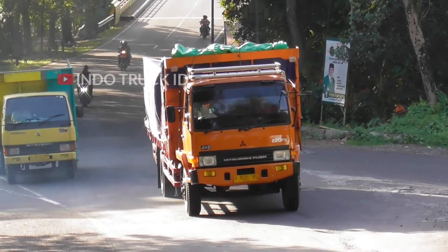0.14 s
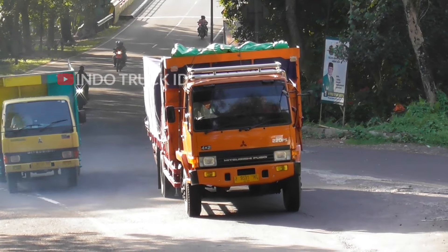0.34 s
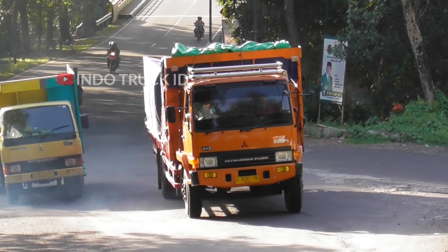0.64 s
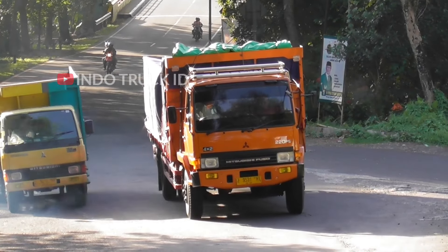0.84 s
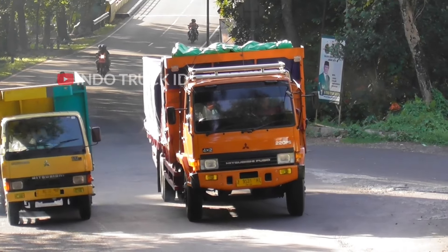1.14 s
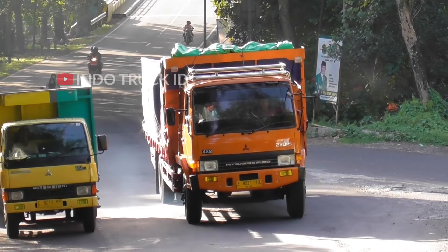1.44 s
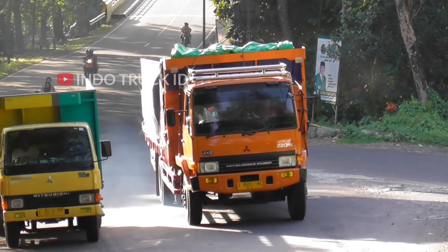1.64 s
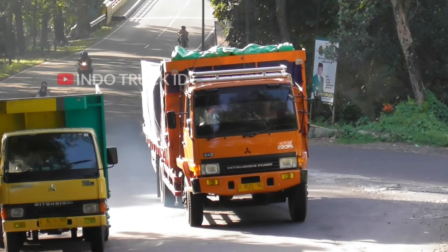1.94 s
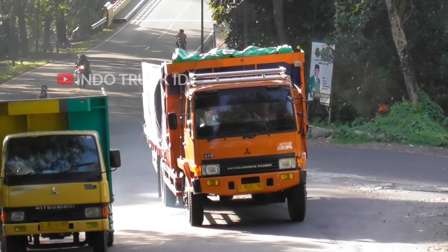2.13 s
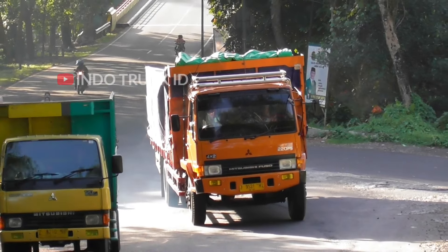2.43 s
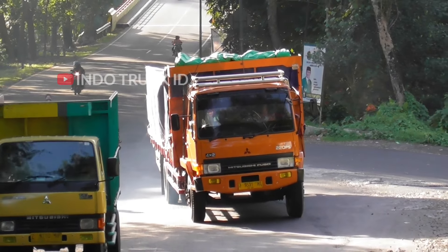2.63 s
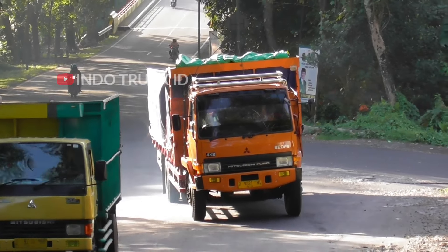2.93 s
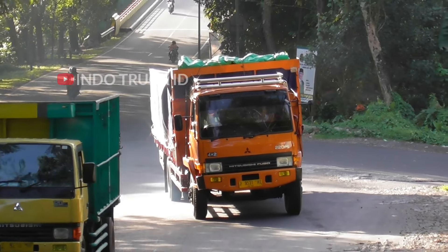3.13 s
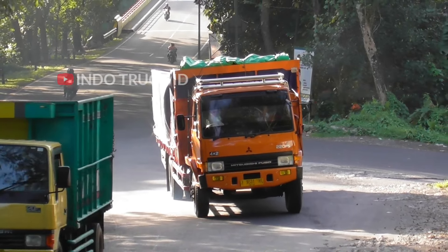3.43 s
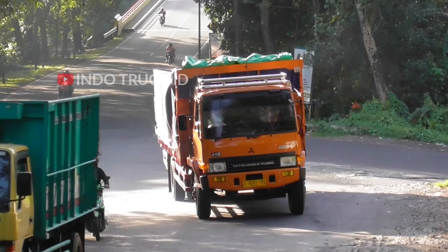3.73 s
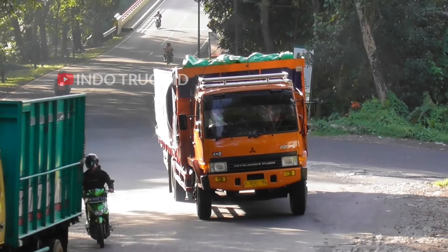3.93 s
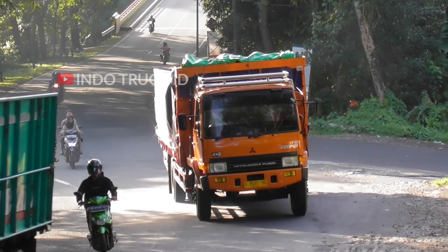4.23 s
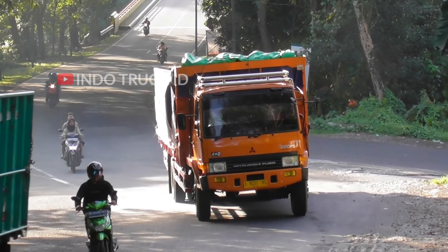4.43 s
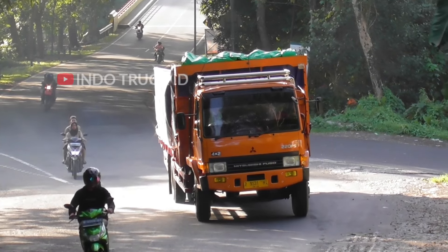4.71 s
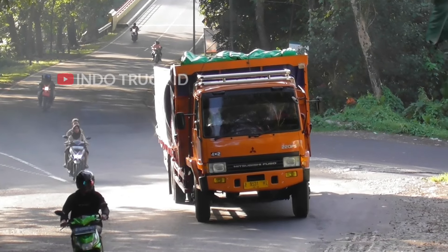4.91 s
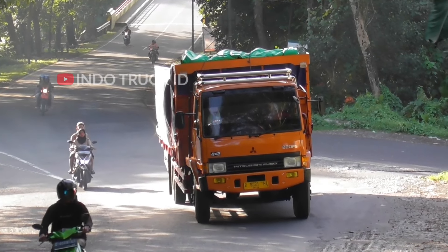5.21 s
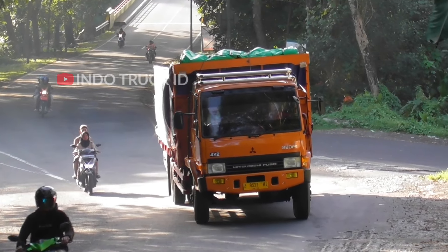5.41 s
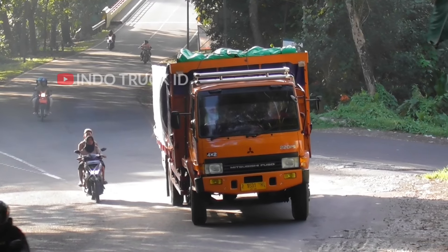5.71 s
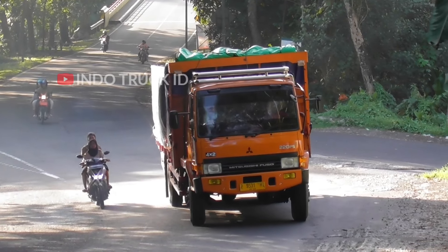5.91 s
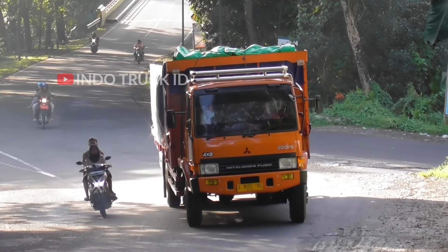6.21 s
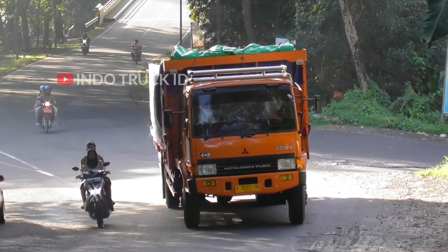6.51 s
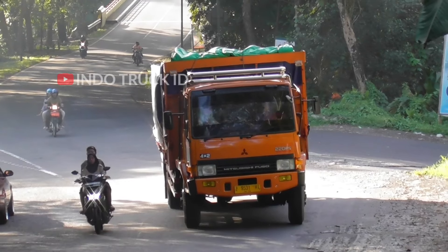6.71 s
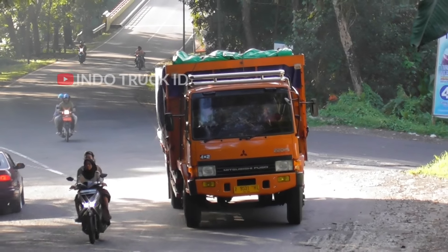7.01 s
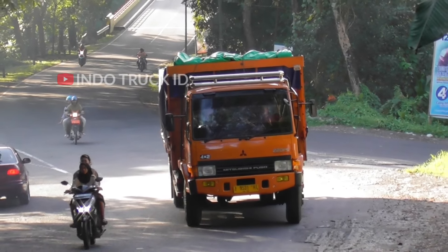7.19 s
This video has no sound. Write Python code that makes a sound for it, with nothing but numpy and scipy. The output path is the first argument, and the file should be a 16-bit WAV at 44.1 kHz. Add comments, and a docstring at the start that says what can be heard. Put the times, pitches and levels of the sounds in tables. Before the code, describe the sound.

Open hill road, close roadside stereo microphones, steady engine noise throughout. From 0 to 2 seconds a loaded diesel drones deep and buzzy, its revs sagging slightly, under a wash of clatter, airy hiss and low tyre rumble. A lighter truck passes at the same time with a gently rising tonal whine and coarse roar; three tiny squeaks come between about 1.1 and 1.5 seconds, with a brief clatter flare near the last and another at 1.9. Its whine and roar fade by around 3 seconds, as a low hum behind recedes. The noise thins near 3.3. From 3 seconds the loaded truck pulls harder, its throbbing exhaust climbing smoothly in pitch, swelling and dipping through hollow resonances. It eases slightly around 5.6, clatter flares at 6.35, then it surges to its highest, loudest and raspiest at the 7.35-second end, with clatter, hiss and rumble swelling.

```python
"""Loaded truck on a hill road

A loaded diesel truck labours uphill towards the microphone and slowly revs higher: harmonics of its
exhaust pulses glide through fixed pipe and body resonances. A lighter truck pulls past in the first
seconds, as a rising set of tones with a noise roar and short squeaks. Another engine hums behind and
recedes. Throbbing bands of noise make the clatter and hiss of engines and the rumble of the road."""
import sys
import numpy as np
from scipy import signal
from scipy.fft import rfft, irfft
from scipy.io import wavfile
from scipy.ndimage import uniform_filter1d, minimum_filter1d

SR = 44100
rng = np.random.default_rng(int(sys.argv[2]) if len(sys.argv) > 2 else 0)


def dump_mix(stems):
    """Bounce the given channels to the path in sys.argv[1] as a 16-bit WAV at rate SR."""
    frames = np.atleast_2d(stems).T  # one column per channel
    limited = np.clip(frames, -1, 1)  # hard clip at full scale
    pcm = np.round(limited * 32767).astype(np.int16)
    wavfile.write(sys.argv[1], SR, pcm)


N = 324116
TIME = np.arange(N) / SR

# the loaded truck's exhaust pulse rate: time_s, pulse_rate_hz
PULSE_RATE = [(0, 55.6), (0.35, 54), (0.9, 53.54), (1.85, 51.74), (2.45, 52.22), (3.05, 53.75),
              (3.65, 57.4), (4.3, 62.93), (5.25, 69.53), (5.6, 71.05), (6, 72.44), (7.15, 82.58),
              (7.35, 82.8)]
# its exhaust grows as it nears and works harder: time_s, level_db
EFFORT_LEVEL = [(0, -10), (1.2, -6.5), (2.1, -6), (3.4, -2), (4.3, 1), (5.6, -2), (6.4, 1), (7.35, 6)]
# strength of the exhaust harmonics: multiple of the pulse rate, level_db
PULSE_HARMONICS = [(1.0, -3.5), (2.0, -1.56), (3.0, 2), (4.0, 4), (5.0, -1), (6.0, -9.5)]
# fixed peaks and dips of the pipe and silencer: frequency_hz, gain_db
PIPE_RESPONSE = [(63.6, -32.7), (81.5, -14.0), (111.9, -14.8), (127.9, -8.7), (140.1, -2.8), (156.3, -9.7),
                 (183, -13), (188.5, -29), (194, -15.5), (209, -16), (231.6, -29.9), (242.2, -19.6),
                 (260.5, -33.6), (288.6, -17.9), (346.7, -34.7), (386.6, -21.8), (408.0, -38.5),
                 (444.0, -8.8), (496.0, -30.4)]
# the echo off the roadside comes sooner as the truck advances
ECHO_MS, ECHO_SHORTENS_MS_PER_S, ECHO_SHARE = 25.1, 0.636, 0.35
# pipe and body resonances that pick out the higher harmonics: centre_hz, width_hz, gain_db
BODY_RESONANCES = [(616, 60, -5.5), (731, 36, -6), (826, 60, -3.5), (1033, 100, -11.5), (1316, 70, -13.5)]
# half steps added by unequal cylinders: multiple of the pulse rate, level_db (within the rasp)
LOPE_HARMONICS = [(1 / 2, -0.63), (5 / 2, -11), (7 / 2, -8.5), (9 / 2, -11.5)]
# the rasp bites harder with the revs: full level, pulse rate that reaches it, growth below that
RASP_DB, RASP_AT_HZ, RASP_DB_PER_HZ = -28, 76.62, 0.7

# the lighter truck's tones: multiple of the strongest tone's pitch, level_db (relative)
PASSING_TONES = [(1 / 2, -13), (1, 0), (6 / 5, -18), (7 / 5, -17.5), (5 / 3, -22.5), (19 / 10, -17.5)]
# the strongest tone's starting pitch and even rise; the tones' level and accelerating fade
PASSING_HZ, PASSING_RISE_HZ_PER_S = 336.5, 10.4
PASSING_DB, PASSING_FADE_DB_PER_S2 = -18.5, 6
# colour of the lighter truck's roar: frequency_hz, density_db (per Hz, relative)
ROAR_COLOUR = [(150, -14), (300, -0.5), (420, -3), (600, -22), (1400, -11), (2000, -20), (3000, -16),
               (4000, -24), (6000, -37), (15400, -70)]
# the roar holds, then dies away
ROAR_DB, ROAR_HOLD_S, ROAR_FADE_DB_PER_S = -26, 1.13, 4
# squeaks as the lighter truck passes: start_s, length_s, peak pitch_hz, peak level_db
SQUEAK_EVENTS = [(1.114, 0.12, 777, -30), (1.247, 0.097, 813, -26.5), (1.415, 0.08, 750, -22.5)]

# tones of the engine behind: pitch_hz, level_db (relative)
HUM_TONES = [(101, -22.5), (152, -19), (189, -21.5)]
# starting trim of the hum and how fast it recedes
HUM_DB, HUM_FADE_DB_PER_S = -2, 3.5

# traffic noise: time_s, clatter_db, hiss_db (both before their trims), rumble_db
TRAFFIC_LEVELS = [(0, -25, -34.5, -20), (.6, -21.5, -31.5, -18), (1.6, -25, -36.5, -19.5),
                  (2.2, -25, -37.5, -18.5), (3.3, -32, -44.5, -24.5), (4.25, -28, -40, -23),
                  (4.7, -29, -41.3, -22.5), (5.8, -29.5, -42.5, -26.5), (6.5, -26, -39, -20.5),
                  (7.35, -20, -31, -18)]
# brief flares of clatter and hiss: peak_s, half_length_s, rise_db
CLATTER_FLARES = [(0.064, 0.028, 2), (1.44, 0.057, 4.5), (1.908, 0.078, 2.5), (3.65, 0.1, 2.5),
                  (6.354, 0.19, 2.5)]
# noise colours: frequency_hz, density_db (per Hz, relative)
CLATTER_COLOUR = [(200, -29), (400, -4.5), (560, 2), (750, 1.5), (1100, -1.5), (1400, -2), (1750, -6.5),
                  (2200, -8), (2800, -9), (3400, -17.5), (4300, -22.5), (7000, -52)]
HISS_COLOUR = [(2000, -21.5), (3500, 0), (4300, -2.5), (5200, 0), (6400, -1.5), (7200, 0.5), (7900, -1),
               (8500, -0.5), (9400, -6.5), (11000, -13.5), (13000, -27), (15400, -27)]
RUMBLE_COLOUR = [(18, -26), (30, -13), (45, -2.5), (60, -8.5), (85, 5.5), (120, -2), (170, 3), (250, -4),
                 (380, -9), (550, -14.5), (900, -56.5)]

# left-right likeness of the noise at the microphone pair: frequency_hz, correlation (held to -1..1)
STEREO_LIKENESS = [(60, 2), (130, 0.57), (290, 1.14), (640, 0.7), (1400, 0.72), (3080, .8), (4500, 0.85),
                   (6800, 1.13), (9500, .2), (13000, -0.5)]
# tilt of the microphone pair: frequency_hz, left_minus_right_db
STEREO_LEAN = [(60, 1.2), (200, 2.5), (380, 4.5), (690, 6.5), (1280, 5.5), (2400, 4.5), (4400, .6),
               (8000, 0.2)]
EDGE_HZ = 15450  # top of the recorded band


def amp(db):
    """Decibels to gain."""
    return 10 ** (np.asarray(db) / 20)


def unit(x):
    """Scales to an rms of 1."""
    return x / np.sqrt(np.mean(x ** 2) + 1e-20)


def curves(rows):
    """Each column of a timed table, at every sample."""
    time_s, *columns = np.transpose(rows)
    return [np.interp(TIME, time_s, column) for column in columns]


def read(points, hz):
    """Reads a spectrum table along a log-frequency axis."""
    table_hz, value = np.transpose(points)
    return np.interp(np.log(hz + 1), np.log(table_hz + 1), value)


def wander(rate_hz):
    """Slow random drift of rms 1, with most of its movement below the rate."""
    count = 2048
    hz = np.fft.rfftfreq(count, TIME[-1] / count)
    slow = irfft(rfft(rng.standard_normal(count)) / (1 + (hz / rate_hz) ** 2))
    return np.interp(TIME, np.linspace(0, TIME[-1], count), unit(slow - slow.mean()))


def angle(hz):
    """The running phase of a frequency curve, in radians."""
    return 2 * np.pi * np.cumsum(hz) / SR


def noise(colour, patchy_db, size=1024):
    """Coloured stereo noise of rms 1, with drifting patches; the treble is more diffuse."""
    hz = np.fft.rfftfreq(size, 1 / SR)
    frames = 4 * N // size + 5
    a, b, c, d, patches = rng.standard_normal((5, frames, len(hz)))
    # smooth over time, then over frequency
    patches = uniform_filter1d(patches, size=10, axis=0)
    patches = unit(uniform_filter1d(patches, size=7, axis=1))
    same = np.clip(read(STEREO_LIKENESS, hz), -1, 1)
    left = a + 1j * b
    right = same * left + np.sqrt(1 - same ** 2) * (c + 1j * d)
    spectra = np.array([left, right]) * amp(read(colour, hz) + patchy_db * patches)
    _, sound = signal.istft(spectra.swapaxes(1, 2), nperseg=size, noverlap=size - size // 4)
    return unit(sound[:, :N])


def exhaust(firing_hz, effort_db, flutter=0.039, jitter_rad=0.044, rough=0.014, dispersion_rad=0.777):
    """Deep harmonics swell and fade as the revs carry them through the pipe's peaks and their own echo.
    The silencer delays the higher ones more, and no two firings are quite alike."""
    stroke = angle(firing_hz) + jitter_rad * wander(rate_hz=14.0)
    echo_s = (ECHO_MS - ECHO_SHORTENS_MS_PER_S * TIME) / 1000
    drone = np.zeros(N)
    for multiple, db in PULSE_HARMONICS:
        k = round(multiple)
        hz = k * firing_hz
        with_echo = abs(1 + ECHO_SHARE * np.exp(-2j * np.pi * hz * echo_s))
        gain = amp(effort_db + db + read(PIPE_RESPONSE, hz)) * with_echo
        gain = gain * (1 + flutter * wander(rate_hz=11))
        drone += gain * np.sqrt(2) * np.cos(k * stroke - dispersion_rad * k ** 2)
    return drone * (1 + rough * wander(rate_hz=45))


def rasp(firing_hz, fading_db=3, smear_rad=0.31):
    """Weak harmonics grow with the revs, swell through the resonances, and fade over changing paths."""
    firing = angle(firing_hz)
    gains = []
    for k in range(7, 20):
        resonance = np.zeros(N)
        for centre_hz, width_hz, db in BODY_RESONANCES:
            resonance += amp(db) / (1 + (2 * (k * firing_hz - centre_hz) / width_hz) ** 2)
        gains.append((k, resonance))
    gains += [(k, amp(db)) for k, db in LOPE_HARMONICS]
    lines = np.zeros(N)
    for k, gain in gains:
        fading = amp(fading_db * wander(rate_hz=1.1))
        lines += gain * fading * np.cos(k * firing + smear_rad * wander(rate_hz=3))
    return amp(RASP_DB + RASP_DB_PER_HZ * np.minimum(firing_hz - RASP_AT_HZ, 0)) * lines


def lighter_truck(smear_rad=0.24):
    """A second engine gathers speed and drops out of hearing as it passes, with a roar of its own."""
    turn = angle(PASSING_HZ + PASSING_RISE_HZ_PER_S * TIME)
    lines = np.zeros(N)
    for k, db in PASSING_TONES:
        lines += amp(db) * np.cos(k * turn + smear_rad * wander(rate_hz=1.5))
    tone_gain = amp(PASSING_DB - PASSING_FADE_DB_PER_S2 * TIME ** 2)
    roar_gain = amp(ROAR_DB - ROAR_FADE_DB_PER_S * np.maximum(TIME - ROAR_HOLD_S, 0))
    return tone_gain * lines + roar_gain * noise(ROAR_COLOUR, patchy_db=1.0)


def squeaks(arch=0.084):
    """A spring or hinge rubs: brief tones that arch in pitch."""
    out = np.zeros(N)
    for start_s, length_s, pitch_hz, db in SQUEAK_EVENTS:
        swell = np.sin(np.pi * np.clip((TIME - start_s) / length_s, 0, 1))
        out += amp(db) * swell * np.cos(angle(pitch_hz * (1 + arch * (swell - 1))))
    return out


def steady_engine(waver_hz=0.45, fading_db=3.0):
    """Low, slightly wavering tones beat against the loaded truck's drone and recede."""
    lines = np.zeros(N)
    for hz, db in HUM_TONES:
        gain = amp(db + fading_db * wander(rate_hz=0.55))
        lines += gain * np.cos(angle(hz + waver_hz * wander(rate_hz=2.0)))
    return amp(HUM_DB - HUM_FADE_DB_PER_S * TIME) * lines


def clatter(firing, clatter_db, hiss_db, knock=0.037, lope=0.06, surge_db=0.4,
            clatter_trim_db=-1, hiss_trim_db=-3.0):
    """Combustion knock and hiss throb with each firing and with the unequal cylinders, and flare at times."""
    throb = unit(1 + knock * np.cos(firing) + lope * np.cos(firing / 2))
    flare_db = surge_db * wander(rate_hz=7.9)
    for peak_s, half_s, rise_db in CLATTER_FLARES:
        flare_db = flare_db + rise_db * np.exp(-((TIME - peak_s) / half_s) ** 2)
    knocking = amp(clatter_db + clatter_trim_db) * noise(CLATTER_COLOUR, patchy_db=0.9)
    hissing = amp(hiss_db + hiss_trim_db) * noise(HISS_COLOUR, patchy_db=0.7)
    return throb * amp(flare_db) * (knocking + hissing)


def rumble(level_db):
    """Tyres and the scattered boom of the engines rise and fall with the traffic."""
    return amp(level_db) * noise(RUMBLE_COLOUR, patchy_db=1.5, size=2048)


def limit(x, ceiling=0.92, recovery_db_per_s=45, size=300):
    """A limiter turns both sides down when a peak would pass the ceiling, then recovers steadily."""
    over_db = 20 * np.log10(np.maximum(abs(x).max(axis=0) / ceiling, 1))
    recovery_db = recovery_db_per_s * TIME
    gain = amp(recovery_db - np.maximum.accumulate(over_db + recovery_db))
    # duck a little ahead of each peak, without a click (size in samples)
    return x * uniform_filter1d(minimum_filter1d(gain, size), size)


def scene():
    """The engines stand in the middle, inside the wider noise of the road."""
    firing_hz, = curves(PULSE_RATE)
    effort_db, = curves(EFFORT_LEVEL)
    clatter_db, hiss_db, rumble_db = curves(TRAFFIC_LEVELS)
    loaded_truck = exhaust(firing_hz, effort_db) + rasp(firing_hz)
    others = lighter_truck() + squeaks() + steady_engine()
    engine_noise = clatter(angle(firing_hz), clatter_db, hiss_db)
    return loaded_truck + others + engine_noise + rumble(rumble_db)


def record(dry, drive_db=0.72, low_cut_hz=36):
    """The microphones lose the deepest bass and lean left in the midrange; then limiter and band limit."""
    hz = np.fft.rfftfreq(N, 1 / SR)
    lean_db = read(STEREO_LEAN, hz)
    sides = amp(np.array([lean_db, -lean_db]) / 2)
    sides = sides / sides.mean(axis=0)
    low_cut = hz ** 4 / np.hypot(hz ** 4, low_cut_hz ** 4)
    heard = irfft(rfft(dry) * low_cut * sides, N)
    limited = limit(amp(drive_db) * heard)
    band_limit = signal.firwin(511, EDGE_HZ, window=("kaiser", 9), fs=SR)
    return signal.oaconvolve(limited, band_limit[None], "same")


dry = scene()
out = record(dry)
dump_mix(out)
```